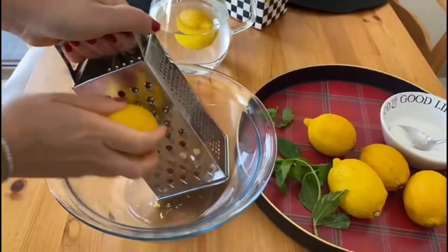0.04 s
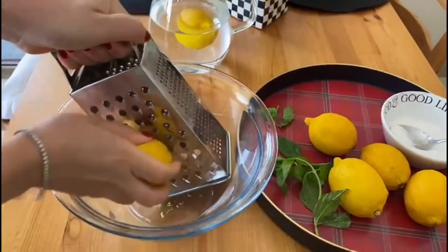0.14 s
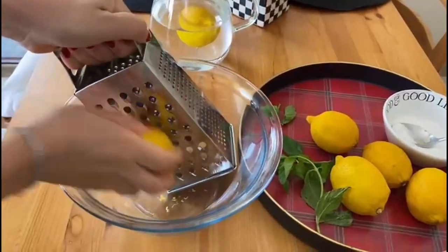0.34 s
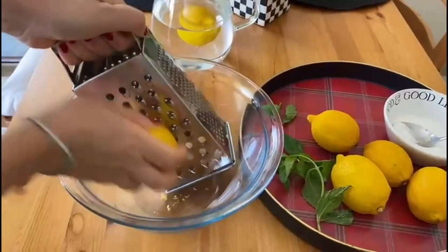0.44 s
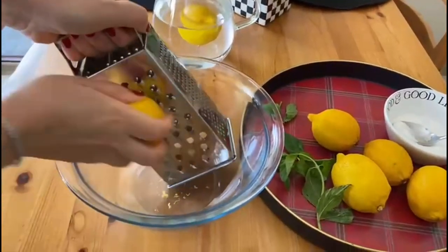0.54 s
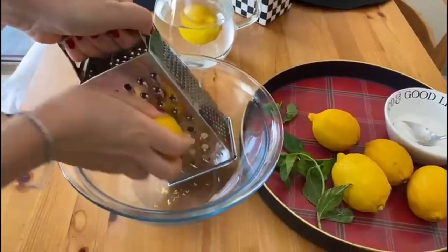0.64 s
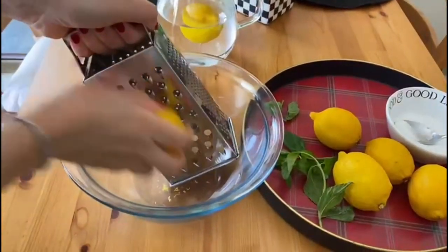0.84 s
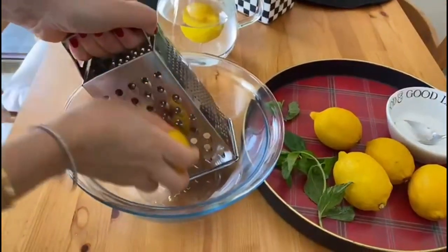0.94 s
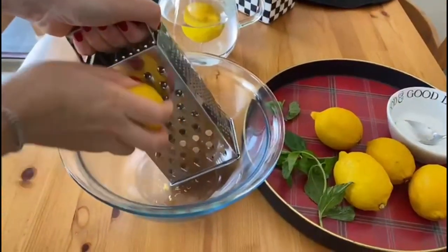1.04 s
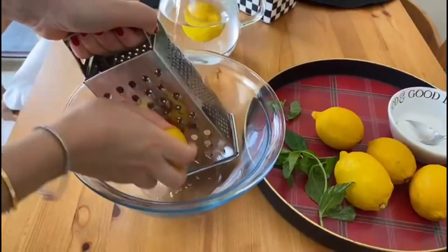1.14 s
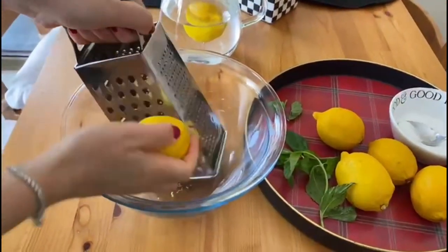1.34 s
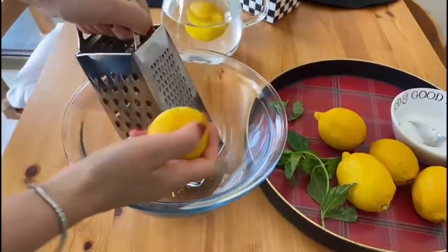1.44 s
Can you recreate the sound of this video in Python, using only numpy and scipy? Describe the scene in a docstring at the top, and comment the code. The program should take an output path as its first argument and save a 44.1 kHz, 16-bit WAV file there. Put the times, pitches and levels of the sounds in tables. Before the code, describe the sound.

Close, quick rasps of lemon peel tearing on a metal grater, with brief squeaks, glassy clinks and dull thuds from bowl and table. The last stroke is lightest. An appliance hums softly in the slightly echoing kitchen.

```python
"""An appliance hums in a fairly live kitchen, and a steel box grater grinds dully in a glass bowl
on a wooden table. The rim clinks on the glass as a lemon starts rubbing up and down the teeth:
six strokes, each tearing the peel in a dense run of tiny snaps, with a brief squeak here and there.
From the end of the first stroke on, the push bumps bowl and table with dull thuds.
A faint clink and a soft bump follow the last, lightest stroke."""
import sys
import numpy as np
from scipy import signal
from scipy.fft import rfft, irfft, next_fast_len
from scipy.io import wavfile

SR = 44100
rng = np.random.default_rng(int(sys.argv[2]) if len(sys.argv) > 2 else 0)


def wav_record(signal):
    """Record a signal, one row per channel, as 16-bit PCM in the file named by sys.argv[1]."""
    frames = np.transpose(np.atleast_2d(signal))
    bounded = np.clip(frames, -1, 1)
    # unit amplitude maps onto the largest positive 16-bit level
    quanta = np.round(bounded * 32767).astype(np.int16)
    wavfile.write(sys.argv[1], SR, quanta)


N = 66150
T = np.arange(N) / SR

# Modes of bowl and table top: pitch_hz, level_db, t60_s
BOWL_AND_TABLE = [(117, -10, .35), (142, -15, .3), (203, -7, .25), (224, -5, .27), (250, -8, .27),
                  (318, -3, .28), (378, -4, .28), (427, -1, .24), (490, -5, .24), (608, -1, .18),
                  (664, 2, .18), (735, -9, .15), (783, -6, .17), (880, -6, .17), (1010, -9, .17)]


def amp(db):
    """Decibels to gain."""
    return 10 ** (np.asarray(db) / 20)


def rms_one(x):
    """Scale to rms 1."""
    return x / np.sqrt(np.mean(x ** 2) + 1e-20)


def at_hz(points, hz):
    """Read a curve on a log-frequency axis."""
    freqs, values = np.transpose(points)
    return np.interp(np.log(np.maximum(hz, 1)), np.log(freqs), values)


def colour(x, points):
    """Minimum-phase EQ that follows a curve of freq_hz, gain_db."""
    size = 2 * next_fast_len(N)
    cepstrum = irfft(np.log(amp(at_hz(points, np.fft.rfftfreq(size, 1 / SR)))))
    cepstrum[1:size // 2] *= 2
    cepstrum[size // 2 + 1:] = 0
    return irfft(rfft(x, size) * np.exp(rfft(cepstrum)))[..., :N]


def soften(x, hz, order=2):
    """Low-pass."""
    return signal.sosfilt(signal.butter(order, min(hz, SR / 2 - 1), fs=SR, output="sos"), x + 1e-18)


def brighten(x, db):
    """Treble shelf."""
    low = soften(x, hz=4300, order=1)
    return low + amp(db) * (x - low)


def band_around(x, hz, octaves, order):
    """Band-pass centred on hz."""
    half = 2 ** (octaves / 2)
    sos = signal.butter(order, [hz / half, hz * half], "band", fs=SR, output="sos")
    return signal.sosfilt(sos, x + 1e-18)


def click(start_s):
    """One unit impulse."""
    return 1. * (np.arange(N) == int(start_s * SR))


def grains(per_s, spread_db):
    """Random impulses of uneven size and sign."""
    sizes = amp(spread_db * np.minimum(rng.exponential(1, N), 4)) * rng.choice([-1, 1], N)
    return sizes * (rng.random(N) < per_s / SR)


def touch(start_s, per_s, after_db, decay_s):
    """One contact and the dying run of smaller ones after it."""
    fade = (T > start_s) * np.exp(-np.abs(T - start_s) / decay_s)
    return click(start_s) + amp(after_db) * grains(per_s, spread_db=2.5) * fade


def drift(hz):
    """Smooth random movement below hz, rms 1."""
    return rms_one(soften(rng.standard_normal(2 * N), hz)[N:])


def wavering(hz, waver_hz):
    """A narrow band of noise: an unsteady tone, rms 1."""
    phase = 2 * np.pi * hz * T
    return rms_one(drift(waver_hz) * np.sin(phase) + drift(waver_hz) * np.cos(phase))


def held(start_s, end_s, attack_s=0.0094, release_s=0.0077):
    """Attack, hold and release of the lemon's pressure."""
    return np.clip((T - start_s) / attack_s, 0, 1) * np.exp(-np.maximum(T - end_s, 0) / release_s)


def ring(x, modes):
    """Drive decaying sines of alternating sign."""
    sound = 0
    for k, (hz, db, t60) in enumerate(modes):
        radius, angle = np.exp(-np.log(1000) / (t60 * SR)), 2 * np.pi * hz / SR
        poles = [1, -2 * radius * np.cos(angle), radius * radius]
        sound += (-1) ** k * amp(db) * signal.lfilter([0, np.sin(angle)], poles, x + 1e-18)
    return sound


def diffuse_noise():
    """White stereo noise, as alike in both channels as diffuse sound is."""
    # Likeness of left and right: freq_hz, correlation
    likeness = [(210, 1), (400, 0), (1000, -0.05), (2200, -0.25), (4200, 0.35), (7000, .4), (11000, 0.25)]
    mid, side = rfft(rng.standard_normal((2, N)))
    alike = at_hz(likeness, np.fft.rfftfreq(N, 1 / SR))
    return irfft(np.sqrt((1 + alike) / 2) * mid + np.sqrt((1 - alike) / 2) * side * [[1], [-1]], N)


def kitchen(x, wet_db, first_echo_s=0.0043, early_db=13.5, early_t60_s=0.021):
    """Direct sound, close reflections off bowl and table, and a tail that dies band by band."""
    # Reverb time of the kitchen: freq_hz, t60_s
    decays = [(100, 0.55), (500, 0.4), (2000, 0.74), (6000, 0.28), (11000, 0.24)]
    centres_hz, t60s = np.transpose(decays)
    noise, hz, tail = rfft(diffuse_noise()), np.fft.rfftfreq(N, 1 / SR), 0
    early = amp(early_db) * np.exp(-np.log(1000) * T / early_t60_s)
    for share, t60 in zip(np.eye(len(decays)), t60s):
        band = irfft(noise * at_hz(list(zip(centres_hz, share)), hz), N)
        tail += band * (np.exp(-np.log(1000) * T / t60) + early)
    tail = rms_one(tail * (T > first_echo_s)) / np.sqrt(N)
    return x + amp(wet_db) * signal.fftconvolve(x[None], tail, axes=1)[:, :N]


def appliance_hum():
    """An appliance hums in wavering, beating tones over a bed of room tone."""
    # Tones of the hum: pitch_hz, level_db, waver_hz
    tones = [(60, -66, 9.8), (118.5, -48, 0.98), (138.5, -45.5, 1.33), (150.74, -45, 2.47),
             (310.2, -54.5, 9.9)]
    # Colour of the room tone: freq_hz, gain_db
    air_eq = [(25, 1), (60, 7), (150, 0), (300, -2), (600, -18), (1200, -14), (3000, -22), (7000, -33)]
    hum = sum(amp(db) * wavering(hz, waver_hz) for hz, db, waver_hz in tones)
    air = soften(colour(diffuse_noise(), air_eq), hz=8000)
    return hum + amp(-48) * rms_one(air)


def foot_grinding():
    """The grater's foot shifts on the glass in small slips that rumble through bowl and table."""
    # How hard the foot grinds: time_s, level_db
    effort = [(0, -53), (.12, -67), (.33, -49.5), (.6, -43.5), (.68, -38.5), (.86, -44), (.98, -40),
              (1.04, -46), (1.17, -39), (1.26, -46.5), (1.32, -47.5), (1.5, -53)]
    # Dull colour of the slips: freq_hz, gain_db
    slip_eq = [(30, -21), (65, -15), (120, 18), (200, -4), (320, 1.5), (500, 4), (700, -9.5), (1000, -24.5),
               (2000, -29)]
    slips = grains(per_s=540, spread_db=1.5)
    rumble = rms_one(colour(slips, slip_eq)) + amp(-7.5) * rms_one(ring(slips, BOWL_AND_TABLE))
    envelope = amp(np.interp(T, *np.transpose(effort)))
    return kitchen(envelope * rms_one(rumble), wet_db=-5)


def rim_clinks(favoured_octaves=0.4):
    """The steel rim hits the glass and chatters briefly; each spot favours different modes."""
    # Rim against glass: start_s, level_db, treble_db, favoured_hz, lift_db
    hits = [(0.0971, -3.5, -9.5, 3040, 3), (0.192, -9, -26, 6300, 3), (.249, -27, -21, 2640, 0),
            (0.458, -4, -23, 7340, -4.5), (0.639, 0.5, -3, 7500, 2), (1.057, -4, -3.5, 3700, 10),
            (1.1282, 1, -3.5, 7600, 3.5), (1.157, -6, -29, 3580, -1), (1.36, -23, -24, 7250, 9),
            (1.483, -19, -19, 7300, 8)]
    # Modes of glass and rim: pitch_hz, level_db, t60_s
    glass = [(2638, -15, .25), (2770, -11, .1), (3490, -17, .1), (3801, -13, .17), (4124, -15, .12),
             (4520, -14, .15), (5319, -11, .2), (6342, -14, .15), (6654, -10, .17), (7144, -9, .11),
             (7418, -7, .15), (7856, -5, .12), (8180, -7, .1), (10030, -9, .09), (10760, -1, .07),
             (11490, -11, .1)]
    # Colour of the contact's crack: freq_hz, gain_db
    crack_eq = [(100, -5.5), (300, 9.5), (600, 3.5), (900, -13.5), (2200, -4.5), (3200, -10.5),
                (4300, -7.5), (5500, -9), (7500, -5), (10800, -8.5), (12500, -15.5)]
    cracks = rings = 0
    for start_s, db, treble_db, favoured_hz, lift_db in hits:
        chatter = touch(start_s, per_s=900, after_db=-2, decay_s=0.0072)
        cracks += amp(db) * brighten(chatter, treble_db)
        modes = [(hz, level + lift_db * np.exp(-(np.log2(hz / favoured_hz) / favoured_octaves) ** 2), t60)
                 for hz, level, t60 in glass]
        rings += amp(db) * ring(brighten(click(start_s), treble_db), modes)
    return kitchen(amp(-6) * colour(cracks, crack_eq), wet_db=7) + kitchen(amp(-31.5) * rings, wet_db=-6)


def peel_rasp(catch_db=1, slide_db=-52.5):
    """Teeth catch and tear the peel; the snaps ring the steel and, more as a stroke runs on, the box."""
    # Bites of the peel: start_s, end_s, start_db, end_db, hollow_hz, hollow_end_db (relative to the bite)
    strokes = [(0.099, 0.205, -47.5, -39, 1600, -10), (0.346, 0.434, -44.5, -37, 1510, -4.5),
               (0.66, .69, -37, -41.5, 1860, -4), (0.884, 0.967, -38.5, -31.5, 1685, -6.5),
               (1.126, 1.225, -39.5, -40, 1390, -6), (1.306, 1.388, -49.5, -50.5, 1720, -2.5)]
    # Colour of tearing peel: freq_hz, gain_db
    peel_eq = [(100, -29.5), (300, 19.5), (550, 11), (800, 4.5), (1200, 13.5), (2100, 2.5), (3200, -1),
               (4300, 0.5), (5500, 0), (7300, 2), (10500, -15), (12500, -11.5)]
    # Modes of the grater's sheet steel: pitch_hz, level_db, t60_s
    steel = [(1130, -1, .09), (1230, -2, .09), (1420, -2, .09), (1590, -2, .09), (1870, -2, .09),
             (2070, 1, .1), (2435, -3, .1), (2783, -3, .1), (4150, -4, .08)]
    snaps = rms_one(grains(per_s=3600, spread_db=2.3) * amp(catch_db * drift(hz=120)))
    pressure = amp(slide_db) * held(start_s=0.193, end_s=1.287)  # light rubbing between strokes
    box = 0
    for start_s, end_s, start_db, end_db, hollow_hz, hollow_end_db in strokes:
        travel = np.interp(T, [start_s, end_s], [0, 1])
        bite = held(start_s, end_s) * amp(start_db + (end_db - start_db) * travel)
        pressure = np.maximum(pressure, bite)
        hollow = rms_one(band_around(snaps, hollow_hz, octaves=0.87, order=2))
        box += amp(hollow_end_db) * travel * bite * hollow
    force = pressure * snaps
    rasp = rms_one(colour(force, peel_eq)) + amp(-8.5) * rms_one(ring(force, steel))
    return kitchen(np.std(force) * rasp + box, wet_db=-4)


def steel_squeaks():
    """Friction briefly feeds one resonance of the steel."""
    # The steel singing under the peel: start_s, end_s, pitch_hz, level_db
    squeaks = [(0.111, 0.218, 1314, -44.5), (0.223, 0.255, 2477, -46), (0.955, 0.968, 1157, -32),
               (1.123, 1.203, 491.4, -42)]
    singing = sum(amp(db) * held(start_s, end_s) * wavering(hz, waver_hz=18)
                  for start_s, end_s, hz, db in squeaks)
    return kitchen(singing, wet_db=-6)


def table_bumps(knock_t60_cycles=14.8):
    """Each soft, heavy contact gives a short pitched knock, judders and sets bowl and table booming."""
    # Grater and bowl bumping the table: start_s, level_db, lowpass_hz, knock_hz, knock_db
    bumps = [(0.2075, -6, 970, 194, -17.5), (0.227, 0.5, 476, 238, -17), (.249, -6.5, 560, 112, -22.5),
             (0.4494, -7.5, 1440, 1400, -16.5), (0.4526, -6, 700, 196, -17), (0.4569, -2, 630, 648, -9),
             (.474, -18, 626, 410, -21), (.494, -8.5, 605, 415, -22), (0.7196, -16, 980, 500, -45),
             (0.7256, -4.5, 556, 142, -18), (1.094, -23.5, 920, 604, -35), (1.109, -20, 384, 304, -32.5),
             (1.193, -5, 134, 114, -31), (1.484, -23, 390, 270, -29.5)]
    # Colour of the dead thud: freq_hz, gain_db
    thud_eq = [(30, -43.5), (55, -13.5), (85, -4), (115, -5.5), (160, -3), (300, 3), (650, -2.5),
               (850, -2.5), (1400, -5), (1800, -16), (4000, -50)]
    judders = blows = knocks = 0
    for start_s, db, lowpass_hz, knock_hz, knock_db in bumps:
        judder = touch(start_s, per_s=450, after_db=-5, decay_s=0.018)
        judders += amp(db) * soften(judder, lowpass_hz)
        blows += amp(db) * soften(click(start_s), lowpass_hz)
        push = band_around(click(start_s), knock_hz, octaves=2, order=1)
        knocks += ring(push, [(knock_hz, knock_db, knock_t60_cycles / knock_hz)])
    thuds = amp(18) * colour(judders, thud_eq)
    boom = amp(-22) * ring(blows, BOWL_AND_TABLE)
    return kitchen(knocks, wet_db=-10) + kitchen(thuds, wet_db=-1.5) + kitchen(boom, wet_db=-6)


def scene():
    """The stereo mix: grating up front, clinks and bumps around it, hum underneath."""
    grating = peel_rasp() + steel_squeaks() + foot_grinding()
    return grating + rim_clinks() + table_bumps() + appliance_hum()


def record(dry, cutoff_hz=13000):
    """The left microphone is brighter; the treble has a notch near 9 kHz and falls away above 12 kHz."""
    # Balance of the pair: freq_hz, left_over_right_db
    balance = [(150, 0.5), (400, 1.1), (1100, 1.2), (2100, -3), (3100, 5), (5800, 3), (7600, 3),
               (11000, -2.5)]
    # Notch and roll-off in the treble: freq_hz, gain_db
    treble_notch_eq = [(8100, 0), (8700, -14), (9200, -14), (9800, 0), (11700, 0), (12400, -16)]
    pair = [colour(channel, [(hz, side * db / 2) for hz, db in balance])
            for channel, side in zip(dry, (1, -1))]
    high_cut = signal.cheby2(14, 60, cutoff_hz, fs=SR, output="sos")
    return signal.sosfilt(high_cut, colour(np.array(pair), treble_notch_eq))


dry = scene()
out = record(dry)
wav_record(out)
```